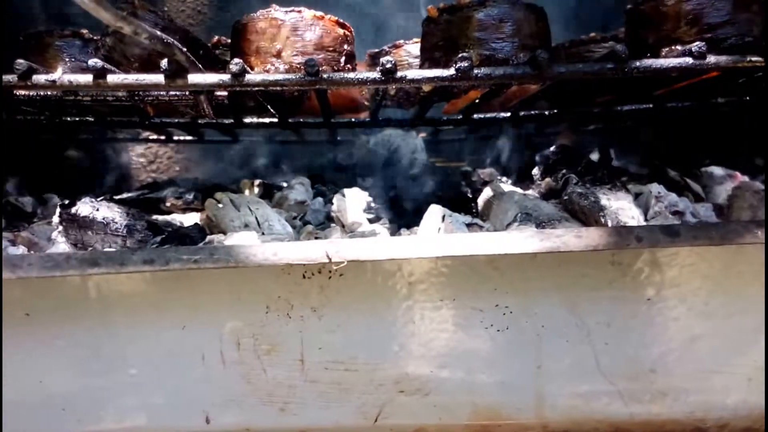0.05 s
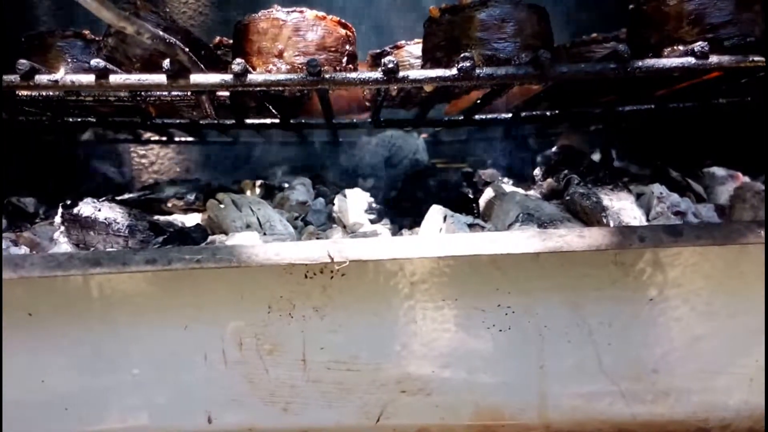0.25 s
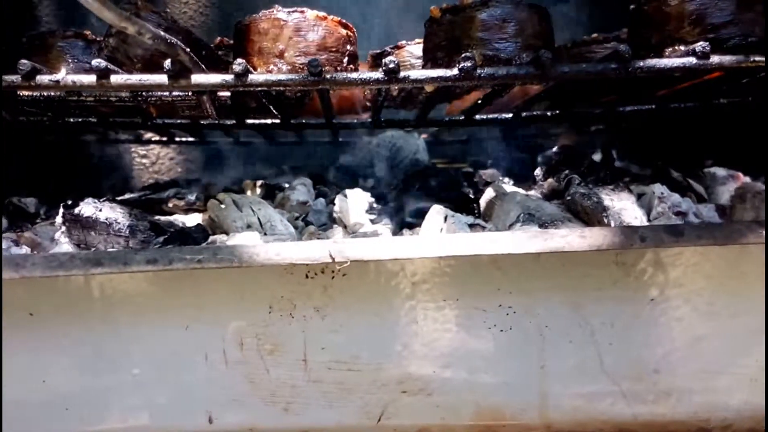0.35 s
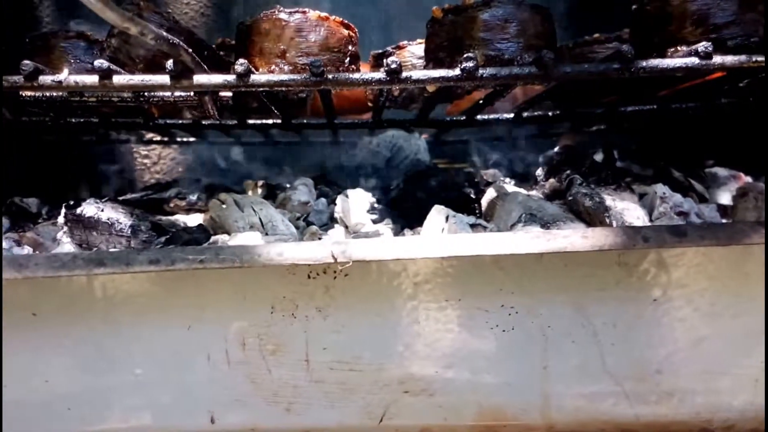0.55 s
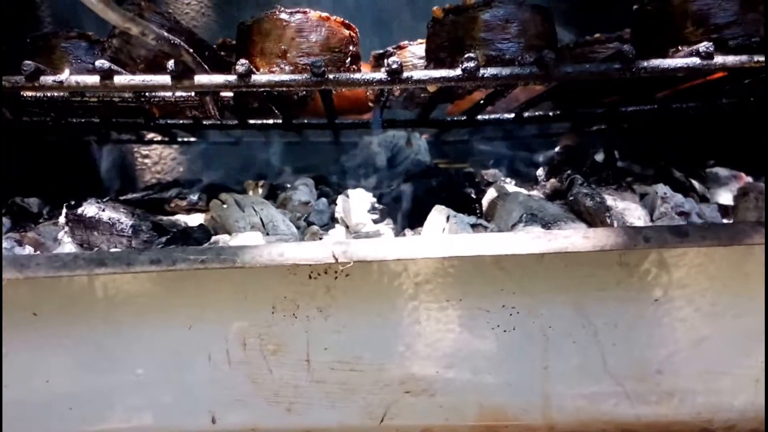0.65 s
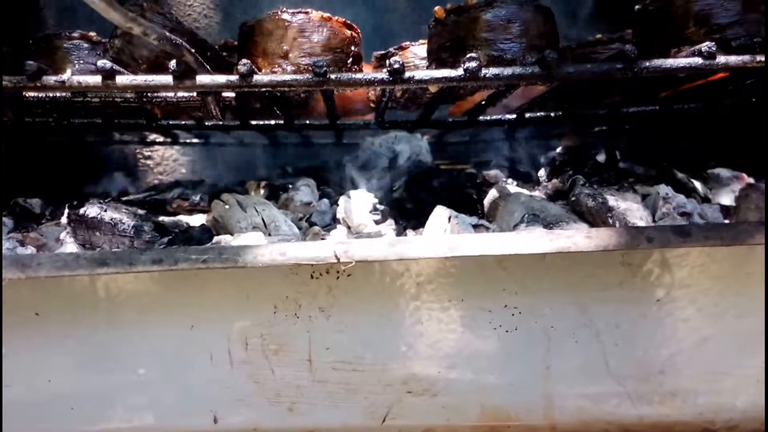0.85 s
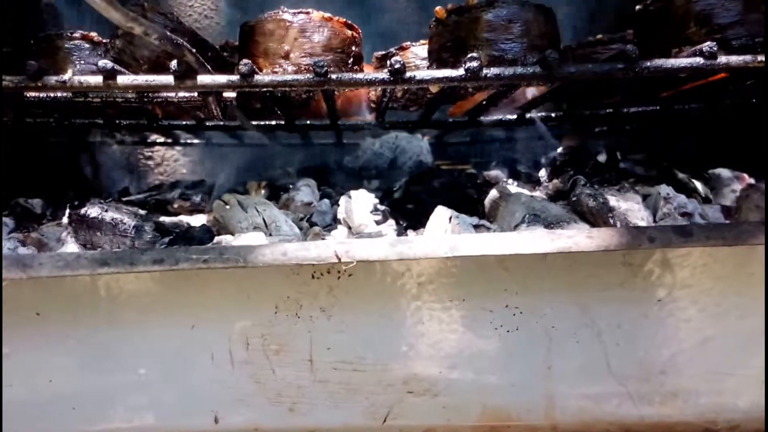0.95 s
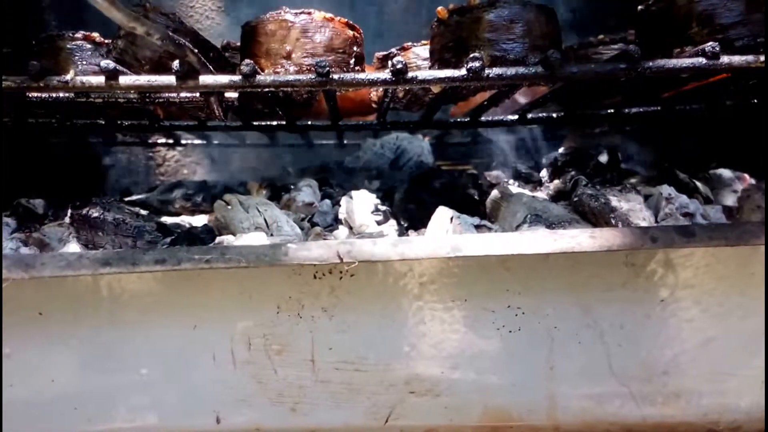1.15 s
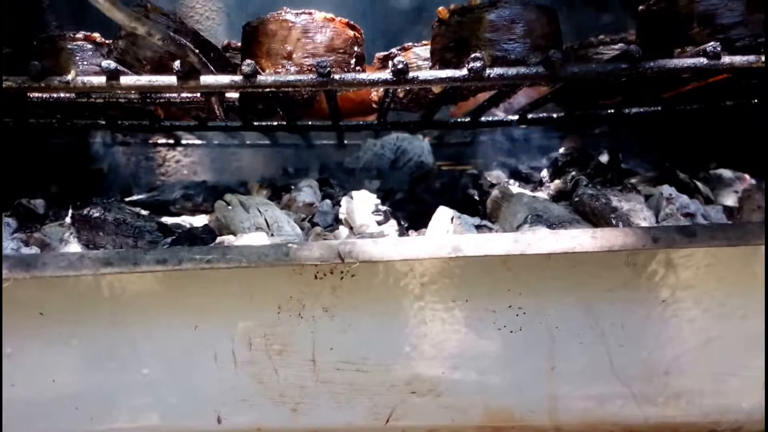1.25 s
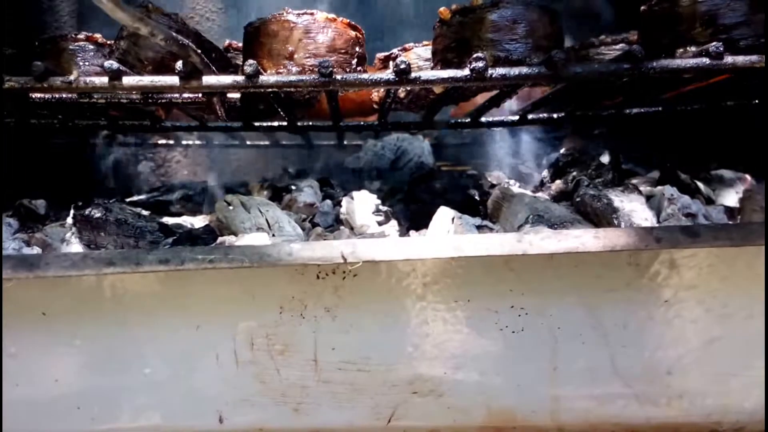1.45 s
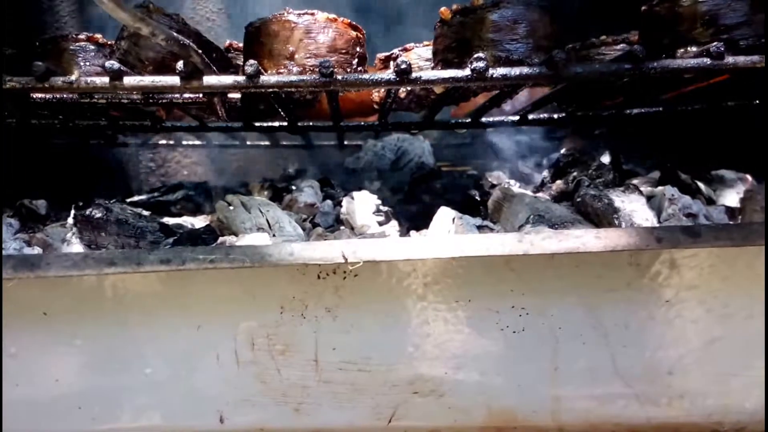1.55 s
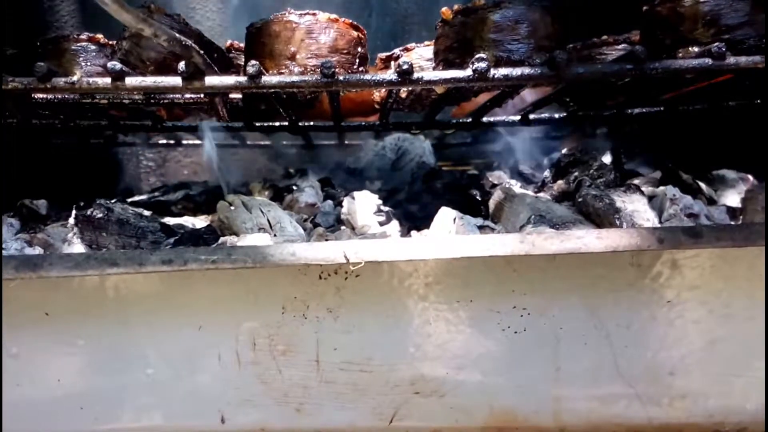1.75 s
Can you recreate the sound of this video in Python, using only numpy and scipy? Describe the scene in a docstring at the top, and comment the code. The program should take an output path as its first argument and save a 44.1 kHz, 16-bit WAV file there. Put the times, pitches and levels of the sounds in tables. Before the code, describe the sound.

Charcoal embers crackle close by in a steel barbecue, over a fine, quiet sizzle and a soft outdoor rumble. The loudest snap comes at about 0.25 seconds with a spit of fat. Smaller pops follow near 0.45 and 0.65, a cluster around 1.1 to 1.2, and light ticks after 1.6. A bird gives faint falling chirps near 0.2, 1.0 and 1.3, with barely audible distant hoots between 0.5 and 1.

```python
"""A fine sizzle of sausages grilling over charcoal, on a soft rumble of outdoor air.
Embers crack with sharp snaps that echo in the steel firebox, and dripping fat spits as it turns to steam.
Behind the grill a bird repeats a raspy falling chirp, and a few faint hoots sound far off.
The right microphone port rings near 5 kHz; the left one hears the top treble."""
import sys
import numpy as np
from scipy import signal
from scipy.fft import rfft, irfft, next_fast_len
from scipy.io import wavfile
from scipy.ndimage import map_coordinates

SR = 44100
rng = np.random.default_rng(int(sys.argv[2]) if len(sys.argv) > 2 else 0)


def persist_wave(psi):
    """Save psi, clipped to +-1, as 16-bit WAV."""
    counts = np.round(np.clip(psi, -1, 1) * 32767).astype(np.int16)
    wavfile.write(sys.argv[1], SR, np.atleast_2d(counts).T)


N = 79380


def amp(db):
    """Decibels to gain."""
    return 10 ** (np.asarray(db) / 20)


def unit(x):
    """Scale to rms 1."""
    return x / np.sqrt(np.mean(x ** 2) + 1e-20)


def along(points, hz):
    """Read a curve of (frequency, value) points on a log frequency axis."""
    knots_hz, values = np.transpose(points)
    return np.interp(np.log(hz + 1), np.log(knots_hz + 1), values)


def pan(db):
    """Left and right gains; positive dB leans left."""
    return amp(np.array([[.5], [-.5]]) * db)


def wobble(rate, size):
    """A smooth random curve with `rate` knots a second."""
    knots = rng.standard_normal(int(size * rate / SR) + 4)
    return map_coordinates(knots, [np.arange(size) * rate / SR])


def eq(x, gain_db):
    """Minimum-phase EQ with gain_db(hz) as its curve."""
    n = x.shape[-1]
    m = 2 * next_fast_len(n)
    gain = np.maximum(amp(gain_db(np.fft.rfftfreq(m, 1 / SR))), 1e-6)
    cepstrum = irfft(np.log(gain), m)
    cepstrum[..., 1:m // 2] *= 2  # folded forward, so nothing rings ahead of a hit
    cepstrum[..., m // 2 + 1:] = 0
    return irfft(rfft(x, m) * np.exp(rfft(cepstrum)), m)[..., :n]


def filtered(x, response):
    """Apply a complex frequency response."""
    m = next_fast_len(2 * N)
    return irfft(rfft(x, m) * response(np.fft.rfftfreq(m, 1 / SR)), m)[:, :N]


def tail(t60, size):
    """Reverb tail: dying stereo noise of energy 1 a side."""
    decay = rng.standard_normal((2, size)) * amp(-60 * np.arange(size) / SR / t60)
    return decay / np.linalg.norm(decay, axis=1, keepdims=True)


def add(out, onset, x):
    """Mix x into out from onset, in seconds."""
    i = max(0, round(onset * SR))
    out[:, i:i + x.shape[1]] += x[:, :max(0, N - i)]


# Tone of the frying: (frequency [Hz], gain [dB])
SIZZLE_EQ = [(300, -12), (1000, -2.5), (2000, 0.5), (4000, 1), (6500, 1.5), (10000, 0), (16000, -4)]
# Fader ride on the hiss: (time [s], level [dB])
HISS_RIDE = [(0, -53), (.4, -52), (.78, -52.5), (1.05, -50), (1.45, -51), (1.65, -49.5), (1.8, -49.5)]


def sizzle(flutter_db=.7, crackles_per_s=100, crackle_db=-41, spread_db=3.5):
    """A bed of fine frying hiss with tiny random crackles on top."""
    colour = lambda hz: along(SIZZLE_EQ, hz)
    ride_db = np.interp(np.arange(N) / SR, *np.transpose(HISS_RIDE))
    hiss = amp(ride_db + flutter_db * wobble(24.9, N)) * unit(eq(rng.standard_normal((2, N)), colour))
    sizes = amp(crackle_db + spread_db * np.minimum(rng.exponential(size=N), 4))
    triggers = rng.random(N) < crackles_per_s / SR
    side_gains = amp(2 * rng.standard_normal((2, N)))
    return hiss + eq(triggers * sizes * side_gains, colour)


# Tone of the outdoor air: (frequency [Hz], gain [dB])
AIR_EQ = [(25, -22), (60, -10.5), (100, -2.5), (140, 2.5), (260, 0.5), (450, -3.5), (900, -1), (1600, -6.5),
          (4000, -25.5)]
# Its lean: (frequency [Hz], left minus right [dB])
AIR_PAN = [(100, -2.5), (170, -1.5), (300, -11), (450, -12.5), (650, -6.5), (950, -2), (1500, -8.5)]
# Its stereo image, lower is wider: (frequency [Hz], left-right correlation [0-1])
AIR_CORRELATION = [(60, 0.47), (160, 0.55), (300, 0.35), (800, 0.092)]


def air(level_db=-54, swell_db=.84):
    """A soft, wide outdoor rumble that swells slightly and leans right."""
    def mid_side_db(hz):
        width = np.arccos(along(AIR_CORRELATION, hz)) / 2
        return along(AIR_EQ, hz) + 20 * np.log10([np.cos(width), np.sin(width)])

    mid, side = eq(rng.standard_normal((2, N)), mid_side_db)
    rumble = eq(np.array([mid + side, mid - side]), lambda hz: np.outer([.5, -.5], along(AIR_PAN, hz)))
    swell = np.array([wobble(14.16, N), wobble(14.17, N)])
    return amp(level_db + swell_db * swell) * unit(rumble)


# Ember cues: (time [s], level [dB], treble shelf [dB], left minus right [dB], ring [Hz])
SNAP_CUES = [(.0476, -17, -3, 1, 5500), (.23485, -1.5, -13, 1, 4800), (.23583, -1, 0, 1, 4900),
             (.2374, 7.5, -8, 1, 5100), (.3500, -17.5, -18, -10.5, 5500), (.3822, -18, -9, -3, 4800),
             (.4473, -4.7, -8.5, -3, 5500), (.4528, -15.5, -15, -4.5, 5000), (.5767, -17, -3, -.5, 5700),
             (.5887, -19, -2, 3, 5000), (.6550, -11, -7, 0, 5500), (.9218, -24, -3, -6, 5800),
             (.9784, -17, -2, 1.5, 6100), (1.0319, -18, -18, 0, 3000), (1.1128, -23, -9, -6, 4200),
             (1.1216, -9, -12, 5, 3400), (1.1564, -20, -5, 9, 5300), (1.1610, -17.5, -12, -2, 6100),
             (1.1835, -7.5, -3, -1, 5300), (1.1871, -13.5, -6, 1, 2900), (1.2668, -29.5, -14, -12, 5400),
             (1.2774, -22, -4, -2, 2500), (1.281, -22, -3, -6, 6300), (1.6421, -17.5, -3, 3, 4300),
             (1.6681, -22, -1, -2, 6000), (1.7877, -18, -3, 0, 5700)]
# Tone shared by all snaps: (frequency [Hz], gain [dB])
SNAP_EQ = [(30, -15), (150, -1), (420, -4), (780, 1.5), (1100, -6), (1800, -8), (3000, -5), (4200, -4.5),
           (5200, -1.3), (7000, 1.5), (16000, 1)]


def ember_snaps(coals_db=-10, coals_t60=.013, box_db=-17, box_t60=.18, ring_db=4, ring_width_hz=450):
    """Charcoal cracks in one sharp pulse and rings briefly; the coals and firebox walls scatter it."""
    out, size = np.zeros((2, N)), 4096
    for onset, db, treble_db, pan_db, ring_hz in SNAP_CUES:
        buried_db = -.4 * db  # fainter snaps lie deeper in the coals and scatter more
        pulse = amp(coals_db + buried_db) * tail(coals_t60, size) + amp(box_db) * tail(box_t60, size)
        pulse[:, 0] += 1  # the direct hit
        shelf = [(5300, 0), (9400, treble_db)]
        ring = lambda hz: ring_db / (1 + ((hz - ring_hz) / ring_width_hz) ** 2)
        snap = eq(pulse, lambda hz: along(SNAP_EQ, hz) + along(shelf, hz) + ring(hz))
        add(out, onset, amp(db) * pan(pan_db) * snap)
    lag_s = [.00008, 0]  # the snaps reach the left port a touch later
    return filtered(out, lambda hz: np.exp(-2j * np.pi * np.outer(lag_s, hz)))


def whistle(length, start_hz, end_hz, t60, fade_db, waver, rasp_db, attack_s=.0049, release_s=.0085):
    """A gliding tone, rough in pitch and level, smeared by the echoes of the yard."""
    t = np.arange(SR // 2) / SR
    progress = np.minimum(t / length, 1)
    hz = start_hz * (end_hz / start_hz) ** progress * (1 + waver * wobble(700, len(t)))
    envelope = np.clip(t / attack_s, 0, 1) * np.clip(1 + (length - t) / release_s, 0, 1)
    level_db = rasp_db * wobble(600, len(t)) - fade_db * progress
    tone = envelope * amp(level_db) * np.sin(2 * np.pi * np.cumsum(hz) / SR)
    paths = tail(t60, len(t))
    paths[:, 0] += amp(-6)  # the direct path sits under the echoes
    wet = signal.fftconvolve(tone[None], paths, axes=1)
    return wet * np.linalg.norm(tone) / np.linalg.norm(wet, axis=1, keepdims=True)


# Chirp cues: (time [s], level [dB], time stretch [ratio], pitch waver [fraction])
CHIRP_CUES = [(.186, -44, 1.03, .027), (1.02, -53, 1.35, .055), (1.282, -44, 1, .03)]
# Pitches the yard echoes bring out of one down-slurred chirp, before its time stretch:
# (time from cue [s], length [s], start pitch [Hz], end pitch [Hz], trim [dB])
CHIRP_PITCHES = [(-.05, .04, 5900, 5100, -13.5), (0, .028, 4520, 4440, -.5), (.008, .03, 4930, 4800, -7),
                 (.018, .018, 4050, 3600, -3), (.042, .024, 3820, 3760, -1), (.055, .03, 3500, 3250, -6.5),
                 (.088, .03, 3190, 3090, -6)]
# Reverb of the yard: (frequency [Hz], time to fall 60 dB [s])
YARD_DECAY = [(3100, .17), (3800, .28), (4800, .36)]


def chirps(pan_db=-5.5):
    """A bird on the right gives a raspy falling chirp; yard echoes bring out a few pitches."""
    out = np.zeros((2, N))
    for onset, db, stretch, waver in CHIRP_CUES:
        for delay, length, start_hz, end_hz, trim_db in CHIRP_PITCHES:
            t60 = along(YARD_DECAY, end_hz)
            tone = whistle(stretch * length, start_hz, end_hz, t60, fade_db=2, waver=waver, rasp_db=4)
            add(out, onset + stretch * delay, amp(db + trim_db) * tone)
    return pan(pan_db) * out


# Fat cues: (time [s], length [s], level [dB])
SPIT_CUES = [(0.2365, 0.0055, -21), (0.387, .002, -40), (0.5197, 0.011, -41), (0.525, 0.0018, -33.5),
             (.8920, 0.0086, -37.5), (0.8949, 0.0008, -29), (1.1838, 0.0071, -27), (1.1675, 0.0015, -41)]
# Tone of the steam jet: (frequency [Hz], gain [dB])
SPIT_EQ = [(80, -22), (700, -7), (2000, -10), (5000, -9), (8000, -6.5), (11000, 2.5), (15500, -2)]


def fat_spits(size=1024):
    """A droplet of fat flashes to steam in a bright burst of a few milliseconds."""
    out, t = np.zeros((2, N)), np.arange(size) / SR
    for onset, length, db in SPIT_CUES:
        jet = unit(eq(rng.standard_normal((2, size)), lambda hz: along(SPIT_EQ, hz)))
        gate = np.exp(-(t / length) ** 4)  # holds, then shuts fast
        add(out, onset, amp(db) * jet * gate)
    return out


# Hoot cues: (time [s], length [s], start pitch [Hz], end pitch [Hz], level [dB])
HOOT_CUES = [(.475, 0.064, 722, 556, -54), (.625, 0.1, 600, 610, -58), (.87, .03, 1054, 1066, -50),
             (.998, 0.034, 945, 938, -46.5)]


def hoots(pan_db=-1, t60=.059):
    """Faint, low bird calls far off, just right of centre."""
    out = np.zeros((2, N))
    for onset, length, start_hz, end_hz, db in HOOT_CUES:
        hoot = whistle(length, start_hz, end_hz, t60, fade_db=-1, waver=.022, rasp_db=1.5)
        add(out, onset, amp(db) * hoot)
    return pan(pan_db) * out


def scene():
    """The grill up front, the yard behind."""
    return sizzle() + air() + ember_snaps() + chirps() + fat_spits() + hoots()


# Left microphone port, open on top: (frequency [Hz], gain [dB])
LEFT_PORT_EQ = [(2000, 0.5), (3500, 6), (5000, 4), (6300, 6.5), (7800, -1), (10500, 5.5), (13000, 2.5),
                (15500, 5)]
# Right port, ringing near 5 kHz and dull above: (frequency [Hz], gain [dB])
RIGHT_PORT_EQ = [(2000, 1), (3500, 6), (4400, 9.5), (5150, 16), (6300, 6), (7300, -2), (8600, -10),
                 (12500, -9), (15500, -13)]


def record(dry, high_cut_hz=15900):
    """Each port colours its side, in opposite polarity; the loudest snap clips; a high cut follows."""
    ports = eq(dry, lambda hz: np.array([along(LEFT_PORT_EQ, hz), along(RIGHT_PORT_EQ, hz)]))
    clipped = np.clip(ports * [[-1], [1]], -1, 1)
    return filtered(clipped, lambda hz: np.clip((high_cut_hz - hz) / 500 + .5, 0, 1) ** 2)


dry = scene()
out = record(dry)
persist_wave(out)
```